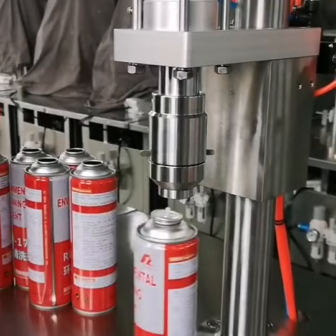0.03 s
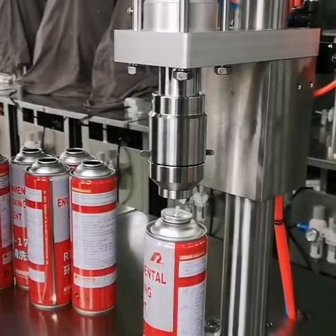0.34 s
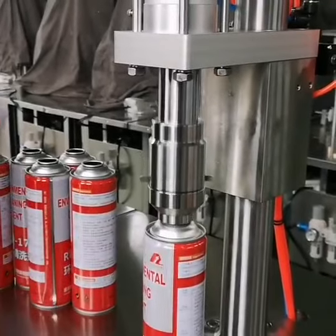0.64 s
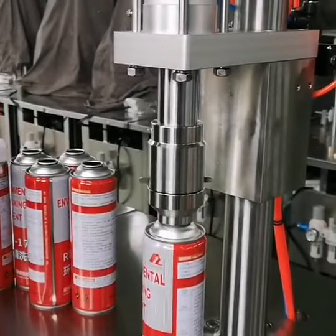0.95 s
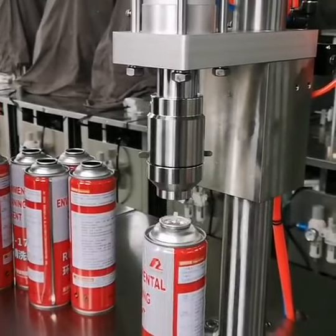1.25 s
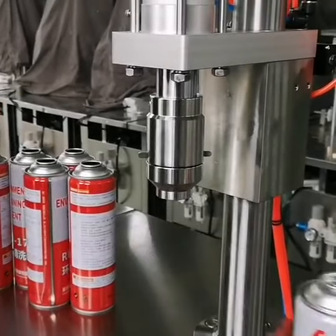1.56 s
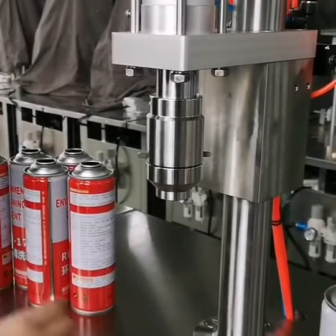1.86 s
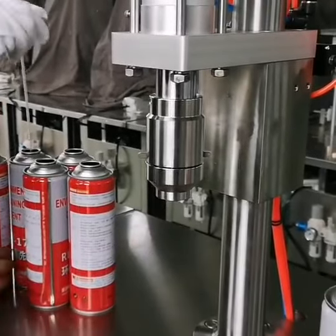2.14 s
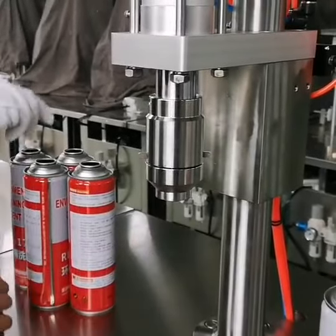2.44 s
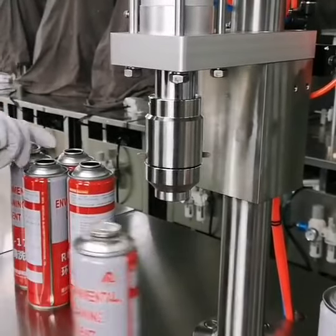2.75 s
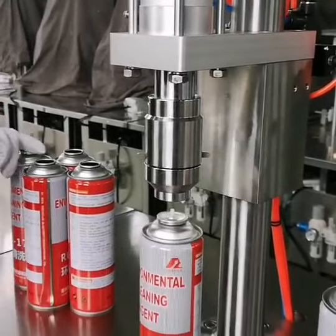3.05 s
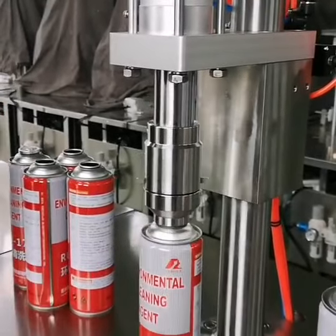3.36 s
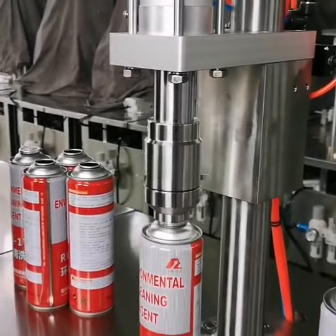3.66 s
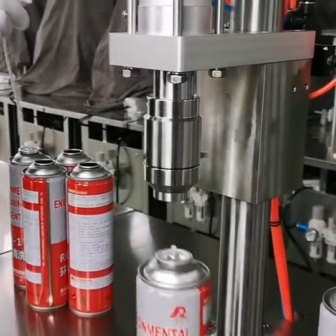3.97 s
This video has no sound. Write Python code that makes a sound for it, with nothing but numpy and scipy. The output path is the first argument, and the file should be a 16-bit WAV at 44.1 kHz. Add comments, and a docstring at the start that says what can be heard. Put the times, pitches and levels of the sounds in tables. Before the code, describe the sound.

A pneumatic press lets out three sharp bursts of air with valve clacks, ending in a metal clank. Cans slide and knock on a steel bench, then the cycle repeats, heard close up in a workshop.

```python
"""Air press crimping cans

Close up in a workshop, an air-driven press crimps the valves onto two metal cans. Each cycle is three
bursts of air (ram down, crimp, ram up), with valve clacks and a clank as the ram hits its top stop.
The bench rumbles and its frame hums on. In between, cans slide over the steel top and knock into place."""
import sys
import numpy as np
from scipy import signal
from scipy.fft import rfft, irfft, next_fast_len
from scipy.io import wavfile
from scipy.ndimage import map_coordinates

SR = 44100
rng = np.random.default_rng(int(sys.argv[2]) if len(sys.argv) > 2 else 0)


def unload_wav(signal):
    """Save mono or channel-first audio to the path in sys.argv[1] as 16-bit WAV at rate SR, clipped to [-1, 1]."""
    wavfile.write(
        sys.argv[1],
        SR,
        np.round(np.clip(np.atleast_2d(signal).T, -1, 1) * 32767).astype(np.int16),
    )


N = 176400  # 4 seconds

# Table levels are relative. A "colour" is the level at each pitch; a "t60" is the time to fade by 60 dB.
# how alike both ears hear close sounds and the room (frequency [Hz], likeness [0 to 1])
NEAR_LIKENESS = [(150, .99), (400, 0.4), (1200, 0.53), (12000, 0.057)]
ROOM_LIKENESS = [(100, 1), (700, 0.7), (3000, 0)]
# metal striking metal (frequency [Hz], level [dB])
METAL_COLOUR = [(300, -35), (1200, 4.5), (2500, 7), (6000, 7), (8500, 1), (11000, -25), (15000, -31)]


def exhaust():
    """The press lets out three bursts of air a cycle, and more air bleeds off as the ram moves."""
    # bursts of air (start [s], length [s], level [dB])
    ram_down = [(.666, 0.16, -15), (3.246, 0.128, -16)]
    crimp = [(.942, 0.065, -22.5), (3.505, 0.071, -23.5)]
    ram_up = [(1.110, 0.11, -18), (3.677, 0.11, -18.5)]
    # the hiss of each burst's outlet (frequency [Hz], level [dB])
    down_colour = [(600, -38), (1200, -13), (1950, -16), (2200, 3), (2700, -8.5), (3400, -2.5),
                   (4700, -7.5), (6300, -9), (7700, -2.5), (8600, -7.5), (9400, -7.5), (10300, -18.5),
                   (14500, -19)]
    crimp_colour = [(300, -28), (700, -9), (1800, -0.5), (2350, -2.5), (3200, 0), (4700, -5), (6500, -7),
                    (7900, -1), (8700, -7), (9500, -4.5), (10500, -22), (14500, -19)]
    up_colour = [(650, -30), (1200, -8.5), (1850, -4.5), (2350, -5.5), (3300, -1.5), (4000, -7.5),
                 (4800, -9.5), (6400, -9), (7600, -1.5), (9400, -6.5), (10600, -17.5), (14500, -19)]
    # air bleeding off (time [s], level [dB])
    bleed = [(.64, -94), (.648, -33), (.81, -22), (.87, -17), (.92, -24), (1.05, -27), (1.31, -25),
             (1.36, -35.5), (3.22, -116), (3.235, -29.5), (3.39, -20), (3.49, -20), (3.62, -26.5),
             (3.87, -26.5), (3.92, -32)]
    return (bursts(ram_down, down_colour, attack_s=0.0011, sag_db_per_s=18, release_s=0.005)
            + bursts(crimp, crimp_colour, attack_s=0.0034, sag_db_per_s=-5, release_s=0.011)
            + bursts(ram_up, up_colour, attack_s=0.0022, sag_db_per_s=9, release_s=0.0054)
            + level(bleed) * amp(0.56 * wobble(40) - 4.5) * hiss(crimp_colour))


def bursts(rows, colour, attack_s, sag_db_per_s, release_s):
    """A valve opens, the pressure sags (or builds, if the sag is negative), and the valve shuts."""
    t, flow = np.arange(N) / SR, np.zeros(N)
    for start, length, db in rows:
        age = np.maximum(t - start, 0)
        opening = 1 - np.exp(-age / attack_s)
        closing = np.exp(-np.maximum(age - length, 0) / release_s)
        flow += amp(db - sag_db_per_s * age) * opening * closing
    flutter = amp(.6 * wobble(110))
    return flow * flutter * hiss(colour)


def hiss(colour, ripple_db=3.5, ripple_hz=70):
    """Rushing air rings the muffler; echoes among steel plates ripple its colour differently per ear."""
    # the muffler's ringing peaks (frequency [Hz], half width [Hz], boost [dB])
    muffler = [(2380, 240, 3), (7600, 150, 2)]
    # which side the hiss leans to (frequency [Hz], left minus right [dB])
    balance = [(300, -9.5), (1290, 1.5), (2380, -8.5), (4400, -1), (8120, -0.5), (15000, -9.5)]
    ripple_points = rng.standard_normal((2, 2048))

    def shape(hz):
        ripple = np.array([map_coordinates(ear, [hz / ripple_hz], mode="mirror") for ear in ripple_points])
        peaks_db = sum(db / (1 + ((hz - centre) / width) ** 2) for centre, width, db in muffler)
        return amp(ripple_db * ripple + peaks_db) * pan(along(balance, hz))
    return noise(colour, NEAR_LIKENESS, shape=shape)


def top_stop(crack_t60=0.056, plates_t60=3.86):
    """The ram slams home: the housing cracks and clanks, and the steel plates sing on faintly."""
    # the ram's blows and one rebound (time [s], level [dB])
    blows = [(1.324, -16.5), (1.342, -27.5), (3.889, -16)]
    # the clank (frequency [Hz], level [dB])
    clank_colour = [(150, -6.5), (260, 2.5), (400, -5), (850, -5.5), (1500, -4.5), (2900, 1), (4400, -10.5),
                    (8500, -15.5), (11500, -44)]
    # how long it lasts (frequency [Hz], t60 [s])
    clank_t60 = [(400, 0.23), (1400, 0.52), (3000, 0.17), (8000, 0.26)]
    # the housing's strongest tones (frequency [Hz], level [dB], t60 [s])
    housing = [(113, -3.5, .11), (151.5, 2.5, .09), (203, 2, 0.14), (620, -16.5, 0.088), (827, -18, 0.36),
               (1030, -24.5, 0.28), (1262, -13.5, 0.36)]
    plates_colour = [(400, -30), (1100, 7.5), (2600, 9), (9000, -35)]
    out, t = np.zeros((2, N)), np.arange(2 * SR) / SR
    for start, db in blows:
        clank = fade(noise(clank_colour, NEAR_LIKENESS, len(t)), clank_t60)
        crack = noise(METAL_COLOUR, NEAR_LIKENESS, len(t)) * amp(-1 - 60 * t / crack_t60)
        body = sum(amp(tone_db - 60 * t / t60) * np.sin(2 * np.pi * hz * t) for hz, tone_db, t60 in housing)
        plates = noise(plates_colour, ROOM_LIKENESS, len(t)) * amp(-22 - 60 * t / plates_t60)
        add(out, start, amp(db) * (clank + crack + body + plates))
    return out * pan(-2)


def valve_clacks():
    """The press's air valves clack sharply."""
    # (time [s], level [dB], ring [Hz])
    clacks = [(.663, -15, 2370), (1.074, -12, 1620), (3.245, -21, 2560), (3.254, -17, 1840),
              (3.640, -12, 1690)]
    # (frequency [Hz], level [dB])
    colour = [(250, 3), (550, -14), (1200, 3.5), (2400, 6), (3500, -10), (15000, -27)]
    return pan(-7) * hits(clacks, colour, t60=0.01, ring_db=-6.5, ring_t60=0.014,
                          after_db=-21, after_t60=0.13)


def metal_clinks():
    """Metal clinks brightly on metal."""
    # (time [s], level [dB], ring [Hz])
    clinks = [(.598, -41.5, 3940), (.802, -9.5, 3700), (.878, -14.5, 4070), (1.022, -14.5, 5580),
              (1.088, -21.5, 5440), (2.243, -37, 5700), (2.638, -23.5, 2950), (2.818, -24.5, 4970),
              (2.832, -21, 6670), (3.068, -26, 4050), (3.089, -15.5, 5550), (3.375, -11, 3440)]
    return pan(-2.5) * hits(clinks, METAL_COLOUR, t60=0.013, ring_db=0, ring_t60=0.021,
                            after_db=-11, after_t60=0.1)


def hollow_taps():
    """Hollow clicks, likely the foot pedal or valve, come just before each stroke."""
    # (time [s], level [dB], ring [Hz])
    taps = [(.350, -18.5, 1030), (.381, -24.5, 1030), (.494, -25, 1060), (.648, -38.5, 1010),
            (3.208, -22.5, 896)]
    # (frequency [Hz], level [dB])
    colour = [(200, -23), (600, -36), (950, 8.5), (1700, -6), (2700, 5.5), (4000, -7), (6000, -11),
              (9300, -7.5), (11500, -30)]
    return pan(-3) * hits(taps, colour, t60=0.015, ring_db=-1, ring_t60=0.022,
                          after_db=-15, after_t60=0.16)


def can_knocks():
    """A can knocks on the bench or its neighbours."""
    # (time [s], level [dB], ring [Hz])
    knocks = [(.192, -31.5, 643), (.214, -30.5, 2890), (2.281, -33.5, 1640), (2.316, -30.5, 1730),
              (2.48, -34, 857), (2.562, -39, 2180), (2.850, -40, 1460), (3.023, -24, 1500),
              (3.0665, -23.5, 1030)]
    # (frequency [Hz], level [dB])
    colour = [(150, 7.5), (300, 3.5), (1400, 2), (3700, -2.5), (6200, -6), (9000, -14), (15000, -36.5)]
    return pan(-0.5) * hits(knocks, colour, t60=0.014, ring_db=-3, ring_t60=0.045,
                            after_db=-6.5, after_t60=0.13)


def hits(rows, colour, t60, ring_db, ring_t60, after_db, after_t60):
    """Short hits: a crack, three close tones from the struck spot, and the body's noisy after-ring."""
    out, t = np.zeros((2, N)), np.arange(SR // 4) / SR
    envelope = amp(-60 * t / t60) + amp(after_db - 60 * t / after_t60)
    ring_fade = amp(ring_db - 60 * t / ring_t60)
    attack = 1 - np.exp(-t / 0.0009)
    for start, db, ring_hz in rows:
        crack = noise_hit(colour, envelope)
        ring = 0
        for side in (-1, 0, 1):  # below, at and above the ring pitch
            hz = ring_hz * (1 + side * 0.0458 * rng.uniform(0.57, 4.08))
            ring += np.sin(2 * np.pi * hz * t + side * rng.uniform(0, 2 * np.pi)) / (1 + abs(side))
        add(out, start, amp(db) * (crack + ring * ring_fade) * attack)
    return out


def thumps(puff_hz=155, puff_t60=0.022, jolt_t60=0.37):
    """The valve pushes out low puffs, and the jolted bench gives dull booms."""
    # (time [s], level [dB])
    puffs = [(.669, -14), (1.074, -15), (3.249, -13), (3.640, -14.5)]
    jolts = [(0.804, -25), (0.85, -25), (0.941, -22), (1.076, -24), (1.326, -19), (3.052, -30.5),
             (3.38, -25), (3.44, -22.5), (3.507, -18), (3.64, -25), (3.89, -19)]
    # the bench's boom (frequency [Hz], level [dB])
    colour = [(35, -67), (70, -4.5), (110, 5.5), (200, -5.5), (270, -13), (400, -16.5), (800, -51)]
    out, t = np.zeros((2, N)), np.arange(SR) / SR
    for start, db in puffs:
        add(out, start, amp(db + 6 - 60 * t / puff_t60) * np.sin(2 * np.pi * puff_hz * t))
    envelope = amp(-60 * t / jolt_t60) * (1 - np.exp(-t / 0.0015))
    for start, db in jolts:
        add(out, start, amp(db) * noise_hit(colour, envelope))
    return out


def frame_hum(waver_db=2.1, rise_s=0.0035):
    """Each heavy blow feeds the frame's low tones, which hum on."""
    # (time [s], level [dB])
    blows = [(0.936, -25.5), (1.326, -32.5), (3.505, -33), (3.89, -45)]
    # (frequency [Hz], level [dB], t60 [s])
    tones = [(82, 1.5, 6.2), (125, -4, 0.45), (194, -13, 3.4), (271, -17, 6.3)]
    t, out = np.arange(N) / SR, np.zeros(N)
    for hz, tone_db, t60 in tones:
        energy = np.zeros(N)
        for start, db in blows:
            age = np.maximum(t - start, 0)
            energy += amp(db - 60 * age / t60) ** 2 * np.minimum(age / rise_s, 1)
        gain = np.sqrt(energy) * amp(tone_db + waver_db * wobble(7.31))
        out += gain * np.sin(2 * np.pi * hz * t + 0.14 * wobble(6.8))
    return out


def can_slides(rough_db=1.25, grain_db=1.5):
    """A can's rim scrapes over the steel top, catching finely as it goes."""
    # (time [s], level [dB])
    slides = [(.02, -36.5), (.16, -55), (.3, -70), (1.43, -43.5), (1.54, -36), (1.68, -42.5), (1.85, -62.5),
              (2.08, -53.5), (2.29, -60.5), (2.33, -41.5), (2.5, -34), (2.82, -35), (3.0, -46.5),
              (3.3, -50)]
    # (frequency [Hz], level [dB])
    colour = [(350, -30.5), (900, -12.5), (1700, -6.5), (2870, -2.5), (4200, -9.5), (7600, -6),
              (10100, -20), (15000, -23.5)]
    catching = amp(rough_db * wobble(45) + grain_db * wobble(420))
    return level(slides) * unit(catching * noise(colour, NEAR_LIKENESS))


def workshop():
    """Steady background noise, and a low rumble that swells with each cycle."""
    # (frequency [Hz], level [dB])
    steady_colour = [(20, 7), (48, 5.5), (170, -2.5), (350, -15), (600, -39.5), (1000, -22), (2200, -22),
                     (15000, -62)]
    rumble_colour = [(20, -27), (50, 15), (70, -4.5), (130, -2), (250, -13.5), (500, -73)]
    # (time [s], level [dB])
    rumble = [(0, -54), (.62, -62), (.9, -36), (1.5, -39.5), (2.3, -38.5), (2.9, -42.5), (3.2, -48),
              (3.6, -34), (4, -46)]
    steady = amp(-47.5) * noise(steady_colour, ROOM_LIKENESS)
    return steady + level(rumble) * noise(rumble_colour, ROOM_LIKENESS)


def room(x, echo_db):
    """Adds the workshop's echo, in which low notes last longest."""
    # (frequency [Hz], t60 [s])
    echo_t60 = [(150, 2.5), (2000, 0.7), (5000, 0.75), (14000, 0.29)]
    tail = fade(noise([(100, 0.015), (15000, 0)], ROOM_LIKENESS, SR), echo_t60)
    tail *= 1 - np.exp(-np.arange(SR) / SR / 0.0037)  # soft start
    tail /= np.linalg.norm(tail[0])
    return x + amp(echo_db) * signal.fftconvolve(x, tail, axes=1)[:, :N]


def noise(colour, likeness, size=N, shape=lambda hz: 1):
    """Stereo noise of average power 1 with a given colour and left-right likeness."""
    hz = np.fft.rfftfreq(size, 1 / SR)
    spread = np.arccos(np.clip(along(likeness, hz), -1, 1)) / 2
    phases = np.exp(2j * np.pi * rng.random((2, len(hz))))
    mid, side = phases * [np.cos(spread), np.sin(spread)]
    spectrum = np.array([mid + side, mid - side]) * amp(along(colour, hz)) * shape(hz)
    return unit(irfft(spectrum, size))


def noise_hit(colour, envelope):
    """Noise that follows a loudness curve (the envelope) and has the same power."""
    return unit(noise(colour, NEAR_LIKENESS, len(envelope)) * envelope) * np.sqrt(np.mean(envelope ** 2))


def fade(x, t60):
    """Each frequency of x dies away at its own speed."""
    hz, t, slices = signal.stft(x, SR, nperseg=256)
    decay = amp(-60 * t / along(t60, hz)[:, None])
    return signal.istft(slices * decay, SR, nperseg=256)[1][:, :x.shape[1]]


def amp(db):
    """Decibels to gain."""
    return 10 ** (np.asarray(db) / 20)


def pan(db):
    """Left and right gains, db apart; negative leans right."""
    return amp(db * np.array([[.5], [-.5]]))


def unit(x):
    """Scales x to average power 1."""
    return x / np.sqrt(np.mean(x ** 2) + 1e-20)


def along(points, hz):
    """Reads between (frequency [Hz], value) points on a log scale."""
    freqs, values = np.transpose(points)
    return np.interp(np.log(hz + 1), np.log(freqs + 1), values)


def level(rows):
    """Turns (time [s], level [dB]) points into a gain per sample."""
    return amp(np.interp(np.arange(N) / SR, *np.transpose(rows)))


def wobble(rate):
    """A smooth curve through `rate` random points a second."""
    return map_coordinates(rng.standard_normal(int(N * rate / SR) + 4), [np.arange(N) * rate / SR])


def add(out, start, x):
    """Mixes x into out, start seconds in."""
    i = max(0, round(start * SR))
    out[:, i:i + x.shape[-1]] += x[..., :max(0, N - i)]


def scene():
    """Press, cans and workshop together."""
    contacts = amp(3) * (hollow_taps() + can_knocks() + metal_clinks() + valve_clacks())
    background = workshop()
    return (room(exhaust(), echo_db=-10.5) + room(top_stop(), echo_db=-9) + room(contacts, echo_db=-17.5)
            + room(thumps(), echo_db=-14) + frame_hum() + can_slides() + background)


def record(dry, left_lag_s=.00004, top_hz=15200):
    """The sound reaches the right microphone just before the left; the highest treble is cut."""
    size = next_fast_len(N + SR // 2)
    hz = np.fft.rfftfreq(size, 1 / SR)
    lag = np.exp(2j * np.pi * hz * left_lag_s * np.array([[-.5], [.5]]))
    treble_cut = 1 / (1 + (hz / top_hz) ** 160)
    return irfft(rfft(dry, size) * lag * treble_cut, size)[:, :N]


dry = scene()
out = record(dry)
unload_wav(out)
```